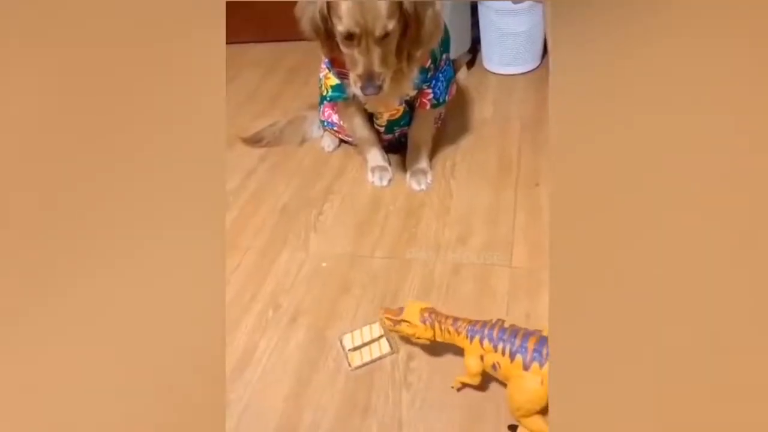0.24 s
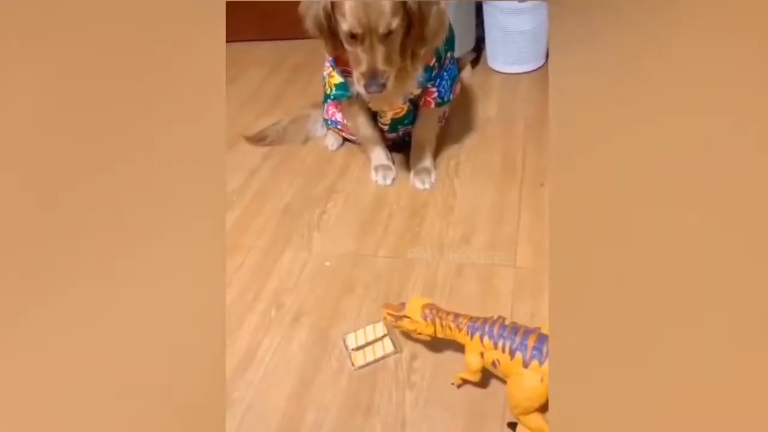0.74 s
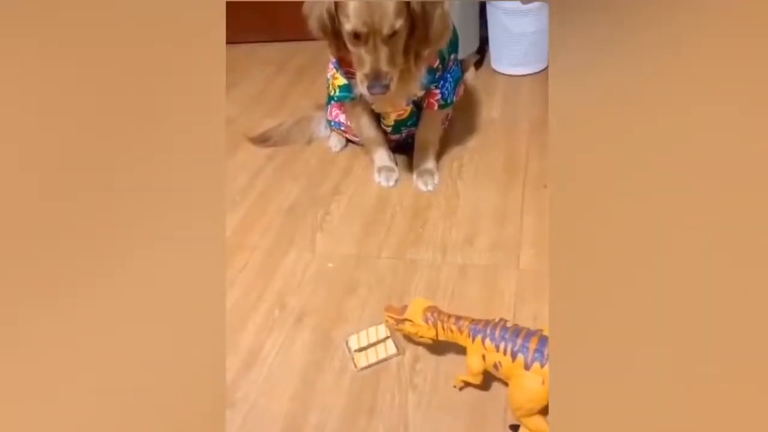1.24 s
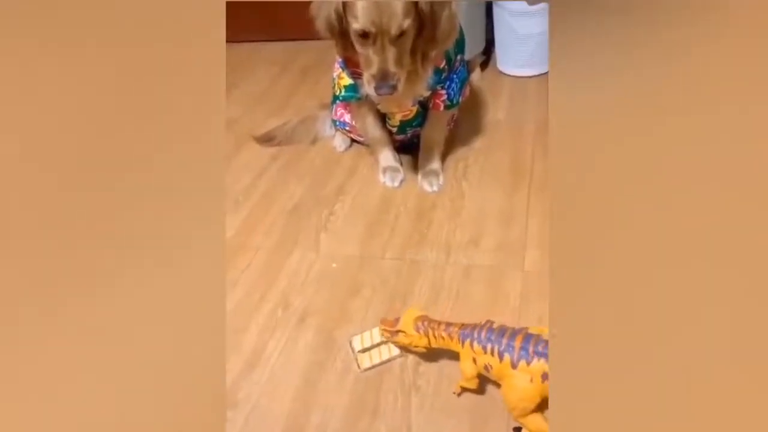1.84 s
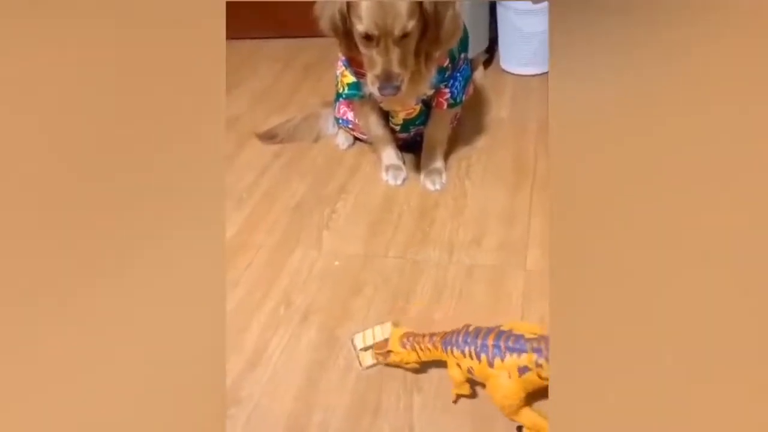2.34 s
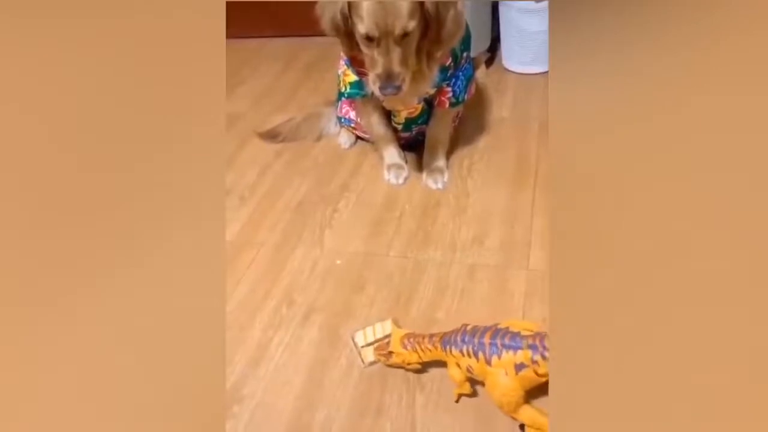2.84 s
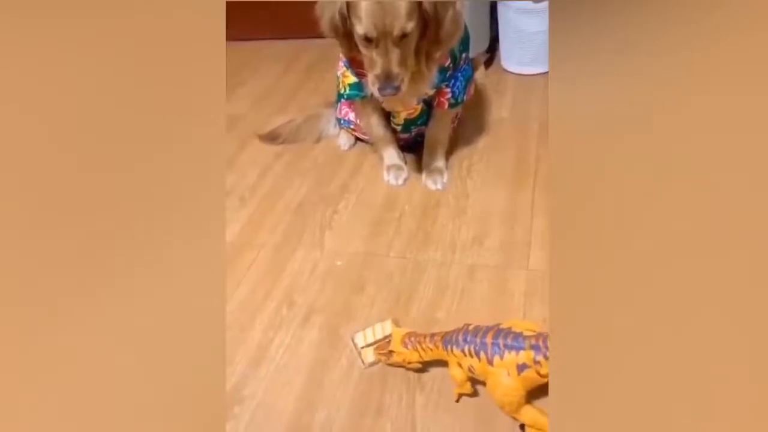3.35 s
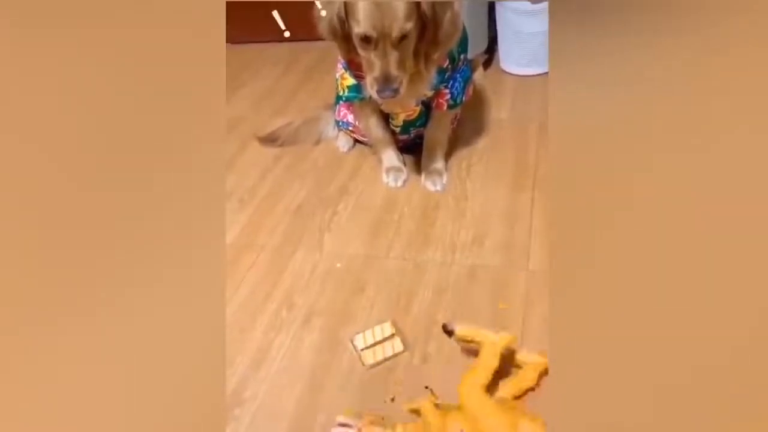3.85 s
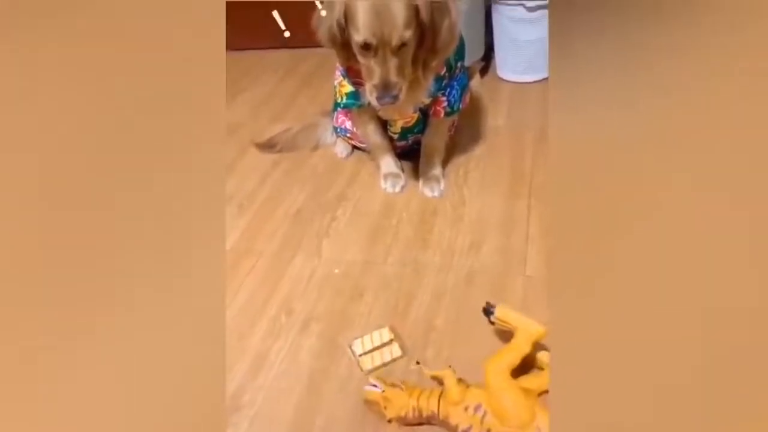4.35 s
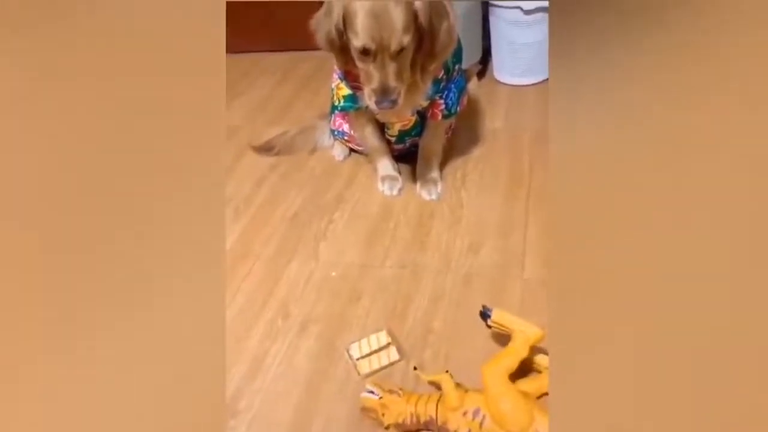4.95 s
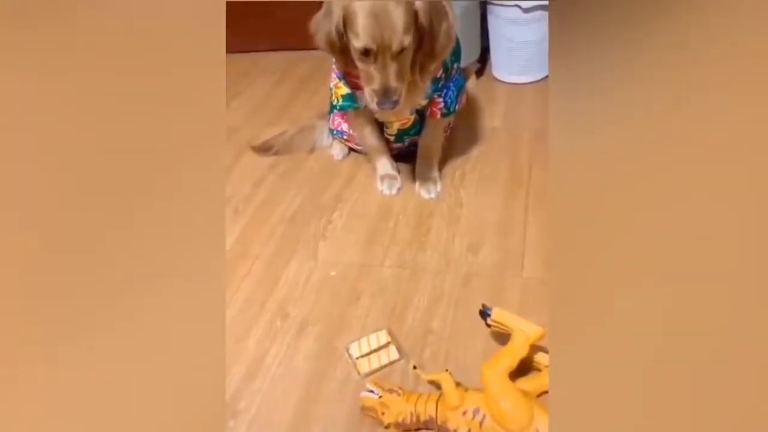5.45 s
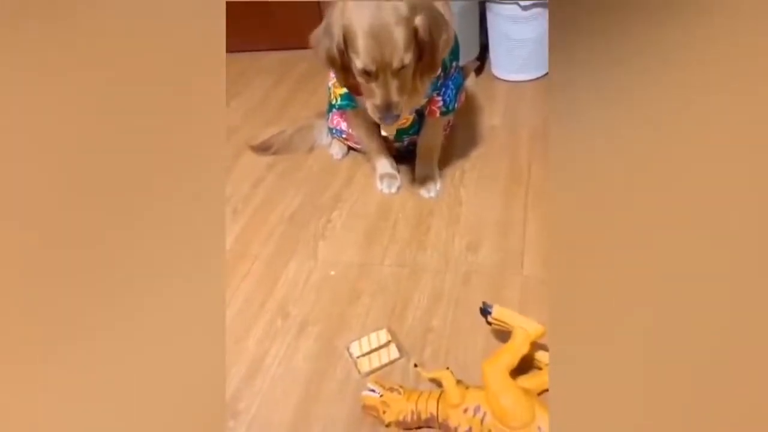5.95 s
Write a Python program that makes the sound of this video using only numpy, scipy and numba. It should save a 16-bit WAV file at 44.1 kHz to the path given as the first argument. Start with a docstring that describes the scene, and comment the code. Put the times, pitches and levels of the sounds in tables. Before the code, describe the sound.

Close to the microphone in a small quiet room, a hollow plastic toy scrapes and rattles on a wooden floor for about a second. It then gives only sparse ticks and low hollow taps, a soft rustle and a brief squeak. A quick scrape leads to a very loud, distorted clatter with a floor boom, followed by a few faint taps, a soft thump and gentle brushing.

```python
"""A hollow plastic toy dinosaur scrapes and taps over a wooden floor, then moves more sparsely.
Dense small contacts and single knocks ring its shell and belly and add fine treble grit.
A soft rustle passes, a foot squeaks, then the toy tips over and clatters: the floor booms, the sound clips.
After a few light taps come a soft thump, another rustle and a long brushing swell.
From start to end the quiet room hums and hisses, made from coloured noise."""
import sys
import numpy as np
from scipy import signal
from scipy.fft import rfft, irfft
from scipy.io import wavfile
from scipy.ndimage import uniform_filter1d, map_coordinates
from numba import njit

SR = 44100
rng = np.random.default_rng(int(sys.argv[2]) if len(sys.argv) > 2 else 0)


def wav_record(signal):
    """Record a signal, one row per channel, as 16-bit PCM in the file named by sys.argv[1]."""
    frames = np.transpose(np.atleast_2d(signal))
    bounded = np.clip(frames, -1, 1)
    # unit amplitude maps onto the largest positive 16-bit level
    quanta = np.round(bounded * 32767).astype(np.int16)
    wavfile.write(sys.argv[1], SR, quanta)


def amplitude_ratio(level_db):
    """Convert a level in decibels to the matching linear amplitude (field) ratio."""
    exponent = np.asarray(level_db, float) / 20
    return 10 ** exponent


N = 272979  # samples in the scene

# Single knocks: (time [s], relative level [dB], favoured pitch [Hz], relative belly level [dB])
KNOCKS = [(0.094, -13, 2052, -25.5), (0.123, -17, 2060, -55), (0.211, -8.5, 2100, -21),
          (0.533, -19.5, 1310, -12), (1.02, -24.5, 1560, -16), (1.082, -35, 1430, -27),
          (1.323, -40, 2280, -20), (1.576, -44, 2410, -13), (1.706, -32.5, 3000, -24),
          (1.726, -26, 1570, -23), (1.749, -27.5, 1670, -19), (1.897, -23, 2340, -14),
          (1.987, -36.5, 2480, -2), (2.048, -32.5, 2182, -8.5), (2.075, -38, 2250, 5.5),
          (2.106, -39, 2200, 5), (2.17, -41, 2360, -24), (2.39, -19.5, 1750, -4.5),
          (2.603, -34.5, 2130, -9), (2.696, -36.5, 2130, -5), (2.883, -34, 1730, -14),
          (3.015, -42, 2470, -5), (3.043, -24.5, 2250, -14), (3.412, -27, 2140, -11), (3.469, -26, 2600, 0),
          (3.536, -25.5, 2100, 1.5), (3.601, -30, 2200, -12.5), (3.89, 1.5, 2440, -29),
          (3.897, 5.5, 2250, -11.5), (3.909, 6.5, 1750, -10), (3.921, 5.5, 2557, -1), (4.057, 1, 1297, -28),
          (4.061, -2, 3020, -26), (4.164, 4, 1880, -28.5), (4.178, -4, 2770, -29), (4.209, -5, 2440, -20),
          (4.404, -32.5, 1200, -34.5), (4.497, -35.5, 2830, -32), (5.171, -45.5, 2720, -15.5),
          (5.695, -42, 1110, 2), (6.101, -36, 1175, -9)]
# Ringing modes of the hard shell: (frequency [Hz], relative level [dB])
SHELL_MODES = [(1100, 1.5), (1250, -7.5), (1400, 1.5), (1560, 0), (1770, -2.5), (1950, -4.5), (2120, -1),
               (2300, -5), (2440, -11), (2580, 1), (2770, -8), (2950, 1), (3200, -7.5), (3500, -4.5),
               (3900, -7.5), (4300, -13.5)]
# Ringing modes of the hollow belly: (frequency [Hz], relative level [dB])
BELLY_MODES = [(260, -6), (345, -6), (385, 0), (480, 5.5), (578, 1), (640, -4), (810, -6)]
# Colour of the fine treble grit: (frequency [Hz], relative level [dB per Hz])
GRIT_COLOUR = [(2650, -28.5), (4500, 1), (5000, -5.5), (5620, 2), (7450, 2), (8710, 2.5), (10500, -0.5),
               (12100, -9), (15000, -28)]
SHELL_T60_S, BELLY_T60_S = .019, .035  # time to die away by 60 dB
SHELL_LOW_HZ, TOY_LOW_HZ = 1134, 320
RUB_OCTAVES, KNOCK_OCTAVES = .35, 0.57  # how wide a range of shell modes answers
RUB_BELLY_DB = -12.5
KNOCK_DB, KNOCK_BELLY_DB, KNOCK_GRIT_DB = -34, -0.5, -6


def toy():
    """The toy's shell, belly and grit, rubbed and knocked: each part shapes the same contact forces."""
    push, bright_hz, grit_push = effort()
    _, level_db, knock_hz, belly_db = np.transpose(KNOCKS)
    knock = amplitude_ratio(level_db + KNOCK_DB)

    # the rubbing energy is shared among the shell modes that speak
    speak = {hz: share(hz, bright_hz, RUB_OCTAVES) for hz, _ in SHELL_MODES}
    shell_push = push / np.sqrt(sum((amplitude_ratio(db) * speak[hz]) ** 2 for hz, db in SHELL_MODES))
    shell = body(SHELL_MODES, SHELL_T60_S,
                 rub=lambda hz: shell_push * speak[hz],
                 hit=lambda hz: knock * share(hz, knock_hz, KNOCK_OCTAVES))

    belly_push = push * amplitude_ratio(RUB_BELLY_DB) / np.sqrt(sum(amplitude_ratio(db) ** 2 for _, db in BELLY_MODES))
    belly = body(BELLY_MODES, BELLY_T60_S,
                 rub=lambda hz: belly_push,
                 hit=lambda hz: knock * amplitude_ratio(belly_db + KNOCK_BELLY_DB))

    rubbed_grit = grit_push * contacts(slide_db=1)
    knocked_grit = blows(knock * amplitude_ratio(KNOCK_GRIT_DB)) * rng.standard_normal(N)
    force = rubbed_grit + knocked_grit
    # colour() levels its result, so the strength of the force is put back
    grit = colour(force, GRIT_COLOUR) * np.sqrt(np.mean(force ** 2))

    # thin walls and a small body radiate little below their lowest modes
    return above(shell, SHELL_LOW_HZ) + above(belly + squeak() + grit, TOY_LOW_HZ)


# Shoves over the floor, each building up until the toy slips free:
# (start [s], slip [s], relative level [dB], favoured pitch [Hz], grit level against shell [dB])
SHOVES = [(0.0, 0.008, -34.5, 1910, -22.5), (0.091, 0.152, -28.5, 2160, -19),
          (0.165, 0.199, -31, 1990, -14), (0.242, 0.349, -24, 2170, -15.5), (0.39, 0.453, -32, 2217, -21),
          (0.476, 0.54, -34.5, 1930, -16.5), (0.55, 0.61, -28, 2280, -16.5),
          (0.634, 0.663, -26.5, 2100, -20), (0.686, 0.707, -32, 2270, -18.5),
          (0.745, 0.78, -29, 2270, -18.5), (0.803, 0.834, -23, 2310, -14.5),
          (0.92, 1.024, -40.5, 1610, -37), (1.08, 1.127, -65, 1550, -26), (1.562, 1.69, -59, 2200, -30),
          (1.734, 1.82, -52.5, 1940, -19), (2.022, 2.069, -47, 2000, -20), (2.087, 2.137, -51.5, 2000, -19),
          (2.154, 2.2, -54.5, 2000, -18), (2.46, 2.52, -60.5, 1690, -10), (3.005, 3.047, -47.5, 2040, -10),
          (3.084, 3.113, -48, 2130, -11), (3.113, 3.213, -49.5, 2180, -8), (3.46, 3.54, -42.5, 2150, -17.5),
          (3.593, 3.624, -30, 2124, -19.5), (3.701, 3.74, -25.5, 2158, -20.5),
          (3.766, 3.863, -21, 2255, -19), (3.881, 3.921, -6.5, 2177, -12), (3.922, 3.947, -9, 2399, -12.5),
          (4.045, 4.097, -18, 2408, -15), (4.143, 4.17, -25, 2050, -8), (4.185, 4.214, -25.5, 2373, -14),
          (4.362, 4.402, -51, 1850, -29.5)]
SHOVE_BUILD_DB = 8
ONSET_DB_S, SHOVE_FALL_DB_S = 1498.5, 191.5  # slopes before the start and after the slip
LEAD_IN_DB_S, RATTLE_FALL_DB_S = 2398, 455.5  # slopes before and after a knock
RATTLE_DB, RATTLE_GRIT_DB = -18.5, -17.5


def effort():
    """Rubbing force, favoured pitch and grit force: shoves and rattles add in power and the strongest lead."""
    t = np.arange(0, N + 32, 32) / SR
    start, slip, db, hz, grit_db = np.transpose(SHOVES)[:, :, None]
    still_to_build = SHOVE_BUILD_DB * np.clip((slip - t) / np.maximum(slip - start, .002), 0, 1)
    onset = ONSET_DB_S * np.maximum(start - t, 0)
    fall = SHOVE_FALL_DB_S * np.maximum(t - slip, 0)
    shove = db - still_to_build - onset - fall

    # a foot skids into every knock, loose parts rattle on after it
    when, level_db, knock_hz, _ = np.transpose(KNOCKS)[:, :, None]
    distance_db = np.where(t < when, LEAD_IN_DB_S * (when - t), RATTLE_FALL_DB_S * (t - when))
    rattle = level_db + RATTLE_DB - distance_db

    power = amplitude_ratio(np.maximum(np.vstack([shove, rattle]), -200)) ** 2
    total = power.sum(axis=0)
    bright_hz = (power * np.vstack([hz, knock_hz])).sum(axis=0) / total
    grit_gain = amplitude_ratio(np.vstack([grit_db, RATTLE_GRIT_DB + 0 * when]))
    grit = (power * grit_gain ** 2).sum(axis=0)
    return (np.interp(np.arange(N) / SR, t, v) for v in (np.sqrt(total), bright_hz, np.sqrt(grit)))


RUB_DB, SLIDE_DB, KNOCK_SCATTER_DB = -5, -1.5, 2
MODE_WANDER_DB, MODE_WANDER_RATE = 4., 25.  # level spread, new levels per second
MODE_DRIFT, MODE_DRIFT_RATE = .04, 14.  # pitch spread as a fraction, new pitches per second


def body(modes, t60, rub, hit):
    """Rubbing and knocks ring the same modes; as the touching spot shifts each swells and bends on its own."""
    slip = contacts(SLIDE_DB)
    sound = 0
    for hz, db in modes:
        pitch = hz * (1 + MODE_DRIFT * walk(MODE_DRIFT_RATE))
        rubbed = rub(hz) * amplitude_ratio(RUB_DB + MODE_WANDER_DB * walk(MODE_WANDER_RATE)) * slip
        # a knock hands each mode its own share, out of step with the others
        scatter = amplitude_ratio(KNOCK_SCATTER_DB * rng.standard_normal(len(KNOCKS)))
        struck = blows(hit(hz) * scatter)
        sound = sound + amplitude_ratio(db) * ring(rubbed, pitch, t60, struck)
    return sound


CONTACT_RATE = 350  # average crunches per second
CONTACT_SPREAD_DB, CONTACT_S = 3.5, 0.002  # unevenness, time constant of the fading


def contacts(slide_db):
    """Stick-slip: uneven crunches, each fading in milliseconds, over a sliding hiss; rms 1."""
    chance = rng.random(N)
    size = rng.exponential(size=N)
    clicks = (chance < CONTACT_RATE / SR) * amplitude_ratio(np.minimum(size, 3) * CONTACT_SPREAD_DB)
    envelope = signal.lfilter([1], [1, -np.exp(-1 / (CONTACT_S * SR))], clicks)
    crunch = unit(envelope * rng.standard_normal(N))
    return unit(crunch + amplitude_ratio(slide_db) * rng.standard_normal(N))


def blows(size):
    """Each knock is a push that swells and dies within a few milliseconds, with size as its peak."""
    force = np.zeros(N)
    force[(np.array(KNOCKS)[:, 0] * SR).astype(int)] = size
    fall = np.exp(-1 / (.0008 * SR))  # 0.8 ms contact
    return signal.lfilter([np.e * (1 - fall)], [1, -2 * fall, fall ** 2], force)


# Strength of one squeaking slide: (time [s], level [dB])
SQUEAK = [
    [(3.0, -62.5), (3.04, -58.5), (3.206, -52.5), (3.3, -111)],
]
# What the squeak rings: (frequency [Hz], level [dB], time to die away by 60 dB [s])
SQUEAK_MODES = [(2473, 10.5, 0.022), (6330, -3.5, 0.004)]


def squeak():
    """A foot slides and its stick-slip rings a narrow mode of its own near 2.5 kHz and a hissy overtone."""
    slip = gain(SQUEAK) * contacts(SLIDE_DB)
    return sum(amplitude_ratio(db) * ring(slip, hz, t60) for hz, db, t60 in SQUEAK_MODES)


def room(x):
    """A small room adds a noisy tail whose treble dies sooner."""
    t = np.arange(SR // 2) / SR
    noise = rng.standard_normal(len(t))
    low = uniform_filter1d(noise, size=6)
    fade = np.log(1000) * t / .3  # the low part loses 60 dB in 0.3 s
    treble = (noise - low) * np.exp(-fade / .55)
    tail = (low * np.exp(-fade) + treble) * (t > .004)
    tail = tail / np.sqrt(np.sum(tail ** 2))
    return x + amplitude_ratio(-8) * signal.fftconvolve(x, tail)[:N]


# Shaking of the boards under the fall, and one soft thump: (time [s], level [dB])
BOOM = [
    [(3.8, -89), (3.862, -52), (3.928, -23.5), (4.262, -42.5), (4.488, -66), (4.6, -54)],
    [(5.17, -73), (5.218, -45), (5.28, -69)],
]
# Low modes of the floor: (frequency [Hz], relative level [dB], decay time split over two stages [s])
BOARD_MODES = [(55, 1.5, 0.15), (71, -0.5, 0.48), (104, 4.5, 0.2), (155, -1, 0.14), (201, 2, 0.083),
               (304, -2.5, 0.017)]


def boards():
    """The weight of the toy shakes the floor's low modes: noise passes twice through each resonance."""
    shake = 0
    for hz, db, t60 in BOARD_MODES:
        once = ring(rng.standard_normal(N), hz, t60 / 2)
        shake = shake + amplitude_ratio(db) * ring(once, hz, t60 / 2)
    return gain(BOOM) * unit(shake)


# Short soft rustles, before their faint tails: (start [s], end [s], level [dB])
RUSTLE = [(2.265, 2.339, -51.5), (5.379, 5.451, -52.5)]
# Colour of the rustles: (frequency [Hz], relative level [dB per Hz])
RUSTLE_COLOUR = [(150, 5), (250, 6.5), (782, 0.5), (878, 0), (9040, -11.5), (11400, -14), (13000, -31)]
# A long brushing swell: (time [s], level [dB])
BRUSH = [(5.5, -64), (5.804, -50.5), (6.04, -57), (6.088, -54.5), (6.19, -56.5)]
# Colour of the brushing: (frequency [Hz], relative level [dB per Hz])
BRUSH_COLOUR = [(290, -30.5), (500, -11), (1390, -1), (1680, -0.5), (2790, 1), (4680, -13), (10500, -13),
                (13000, -18)]
RUSTLE_TAIL_S, RUSTLE_TAIL_DB = .05, -4.5  # tail length; each of two drops


def rustles():
    """Two short puffs of coloured noise and a longer brushing whose level flickers a little."""
    shape = []
    for start, end, db in RUSTLE:
        tail = [(end + 0.0068, db + RUSTLE_TAIL_DB), (end + RUSTLE_TAIL_S, db + 2 * RUSTLE_TAIL_DB)]
        shape.append([(start, db), (end, db)] + tail)
    puffs = gain(shape) * colour(rng.standard_normal(N), RUSTLE_COLOUR)
    flicker = amplitude_ratio(1.185 * walk(27.0))
    brushing = gain([BRUSH]) * flicker * colour(rng.standard_normal(N), BRUSH_COLOUR)
    return puffs + brushing


# Colour of the room noise: (frequency [Hz], relative level [dB per Hz])
AIR_COLOUR = [(15, -42), (25, -13.5), (76, -2), (110, -11), (271, -20.5), (335, -21.5), (511, -24.5),
              (824, -29), (1510, -31.5), (2860, -35.5), (11600, -44.5), (14000, -59)]
# Wavering of the low hum: (time [s], level [dB])
HUM = [(0, -3.5), (1., 1.5), (1.6, -3.5), (2.7, 3), (4.6, -2.5), (5.4, 2.), (6.19, 5)]


def air():
    """Steady noisy hiss over a low hum, the bottom of the same noise, that wavers in level."""
    noise = colour(rng.standard_normal(N), AIR_COLOUR) * amplitude_ratio(-53.5)
    hum_filter = signal.butter(2, 186.4, fs=SR, output="sos")  # keeps what lies below 186.4 Hz
    low = signal.sosfiltfilt(hum_filter, noise)
    return noise - low + low * amplitude_ratio(column(HUM, index=1))


def unit(x):
    """Scale to rms 1."""
    return x / np.sqrt(np.mean(x ** 2))


def column(rows, index):
    """One column of a table, joined by straight lines over the whole time."""
    rows = np.asarray(rows, float)
    return np.interp(np.arange(N) / SR, rows[:, 0], rows[:, index])


def gain(tables):
    """Gain of several (time [s], level [dB]) stretches, silent between them."""
    t = np.arange(N) / SR
    on = sum((t >= rows[0][0]) * (t <= rows[-1][0]) for rows in tables)
    soft_edges = uniform_filter1d(1. * on, size=221)
    return amplitude_ratio(column(sum(tables, []), index=1)) * soft_edges


def colour(x, points):
    """Filter a signal by a (frequency [Hz], level [dB]) curve and scale it to rms 1."""
    hz, db = np.transpose(points)
    f = np.maximum(np.fft.rfftfreq(len(x), 1 / SR), 1)
    curve = amplitude_ratio(np.interp(np.log(f), np.log(hz), db))
    return unit(irfft(rfft(x) * curve, len(x)))


def ring(x, hz, t60, push=np.zeros(N)):
    """One damped mode, pitch fixed or moving; steady noise of rms 1 comes out at about rms 1."""
    r = np.exp(-np.log(1000) / (max(t60, .003) * SR))
    angle = 2 * np.pi * hz * np.ones(N) / SR
    return 2 * np.sqrt(1 - r) * spin(x, push, angle, r, 2 * np.pi * rng.random())


@njit
def spin(x, push, angle, r, start):
    """A decaying rotation shaken by x and pushed in step by push; its speed may drift."""
    y, z, lead, turn = np.empty(len(x)), 0j, np.exp(1j * start), 0j
    for i in range(len(x)):
        if i % 32 == 0:
            turn = np.exp(1j * angle[i])
        lead *= turn
        z = z * r * turn + x[i] + push[i] * lead + 1e-18
        y[i] = z.imag
    return y


def walk(rate):
    """Random levels joined smoothly, rate new ones a second; spread near 1."""
    steps = rng.standard_normal(N // 100)
    places = np.arange(0, N, 32) * rate / SR
    return map_coordinates(steps, [places], order=3).repeat(32)[:N]


def share(hz, centre_hz, octaves):
    """How strongly a mode speaks when the contact favours centre_hz."""
    return np.exp(-.5 * (np.log2(hz / centre_hz) / octaves) ** 2)


def above(x, hz):
    """High-pass: keep what lies above hz."""
    return signal.sosfilt(signal.butter(3, hz, "high", fs=SR, output="sos"), x)


def scene():
    """The toy in its room, over boards, rustles and air; the quiet layers lose their treble above 11.8 kHz."""
    treble_cut = signal.butter(8, 11800, fs=SR, output="sos")
    quiet = signal.sosfilt(treble_cut, rustles() + air())
    return (room(toy()) + boards() + quiet)[None]


def low_pass(x):
    """Removes everything above the highest recorded frequency."""
    return signal.sosfilt(signal.butter(12, 15620, fs=SR, output="sos"), x)


def record(dry):
    """The fall overloads the close microphone, which cuts off peaks beyond full scale."""
    mix = np.clip(dry, -1.0, 1.0)
    return low_pass(mix)


dry = scene()
out = record(dry)
wav_record(out)
```